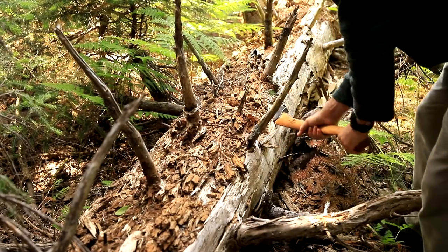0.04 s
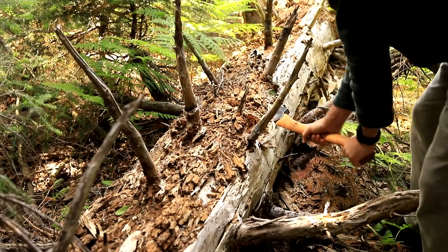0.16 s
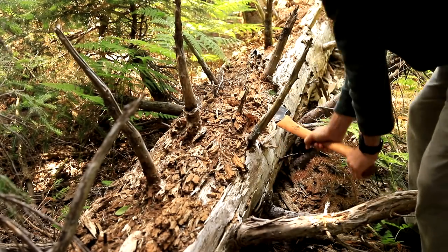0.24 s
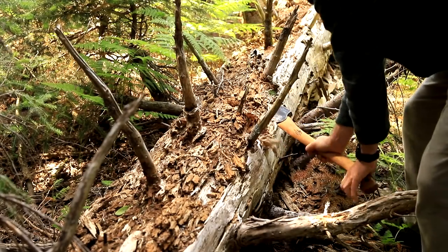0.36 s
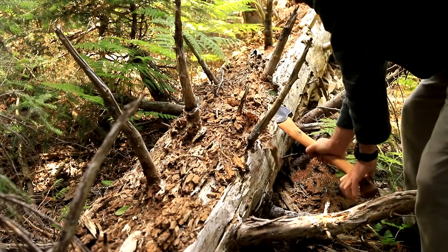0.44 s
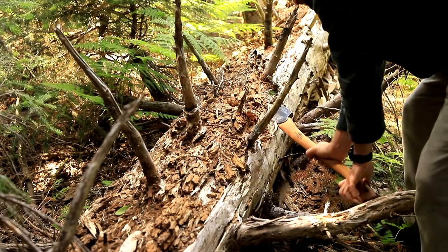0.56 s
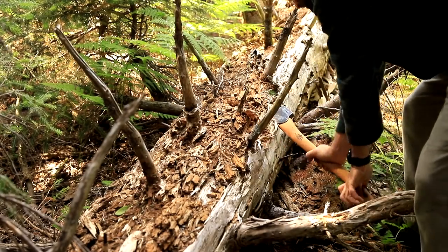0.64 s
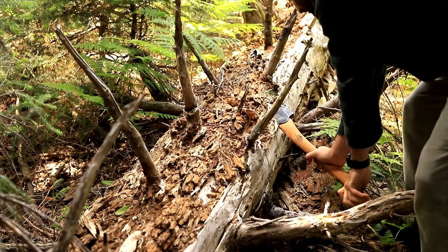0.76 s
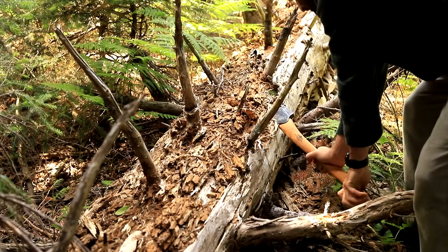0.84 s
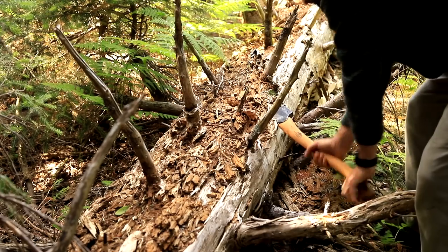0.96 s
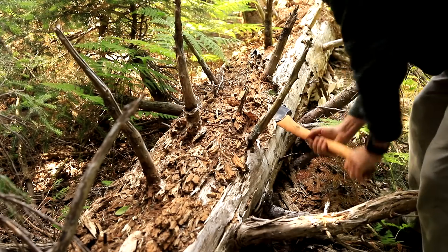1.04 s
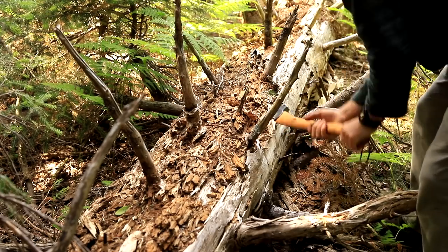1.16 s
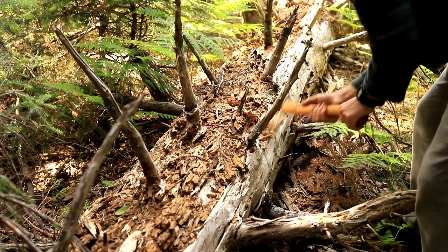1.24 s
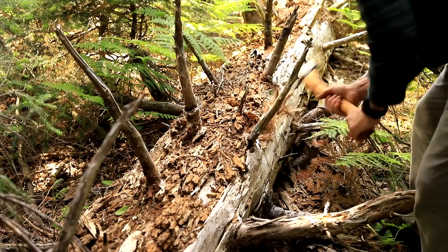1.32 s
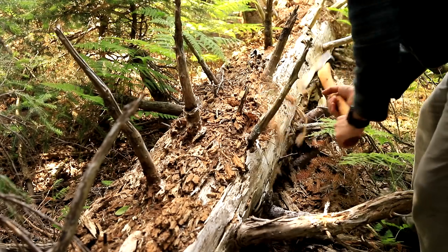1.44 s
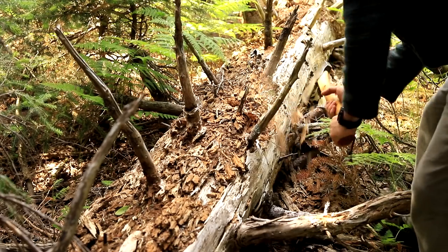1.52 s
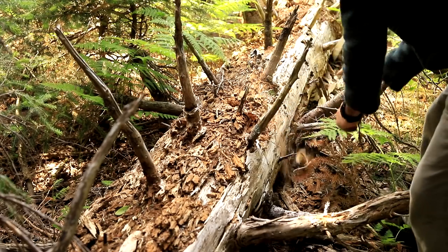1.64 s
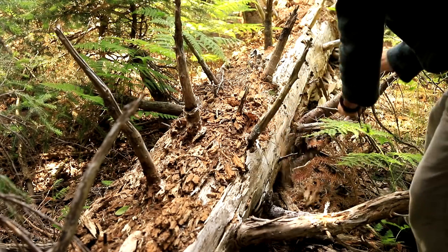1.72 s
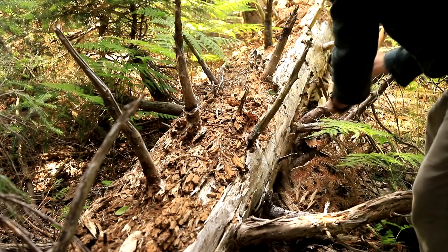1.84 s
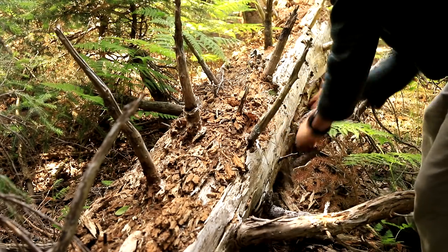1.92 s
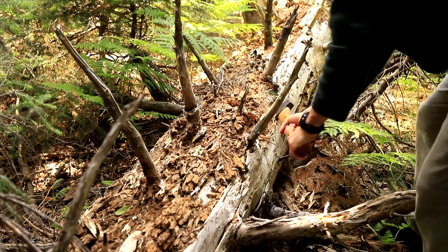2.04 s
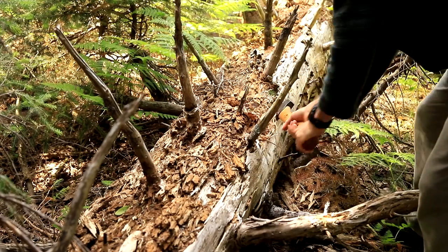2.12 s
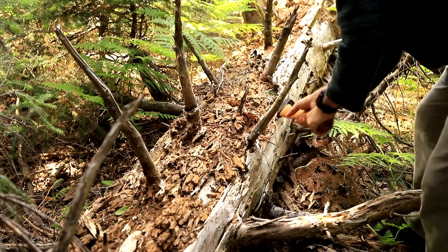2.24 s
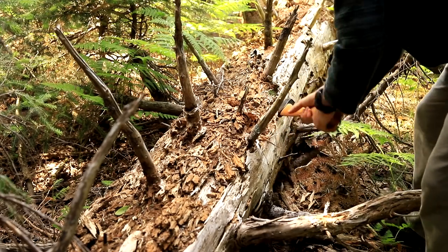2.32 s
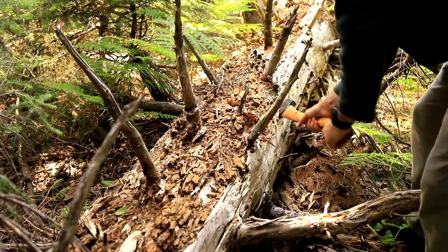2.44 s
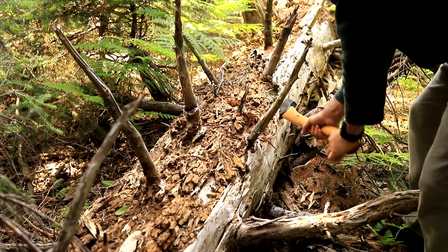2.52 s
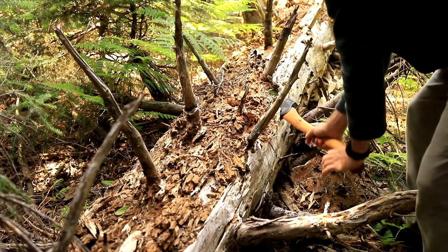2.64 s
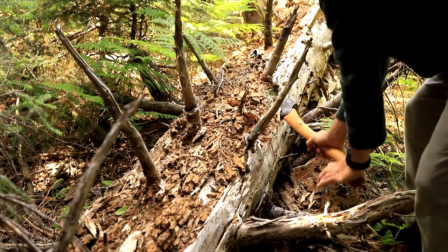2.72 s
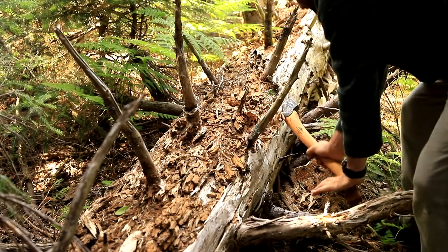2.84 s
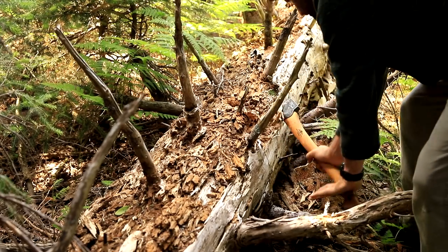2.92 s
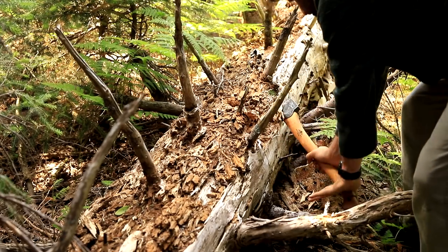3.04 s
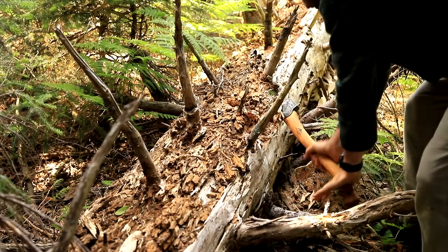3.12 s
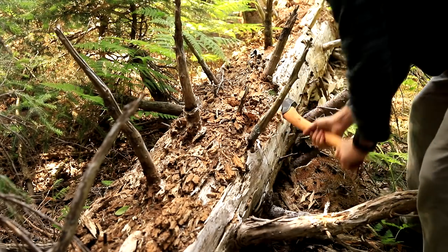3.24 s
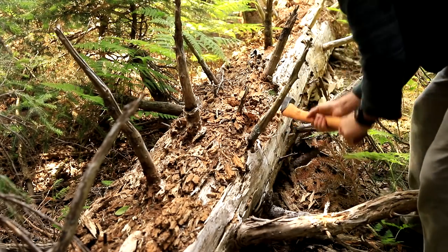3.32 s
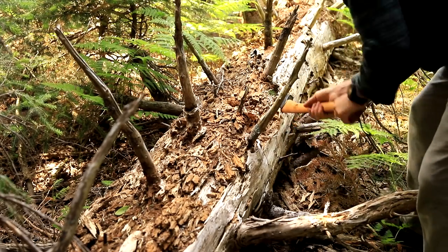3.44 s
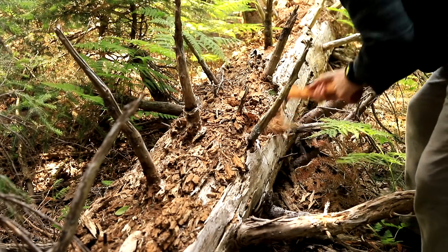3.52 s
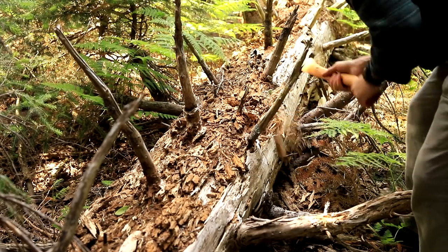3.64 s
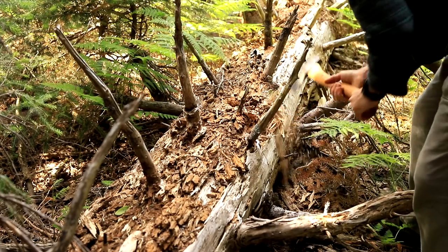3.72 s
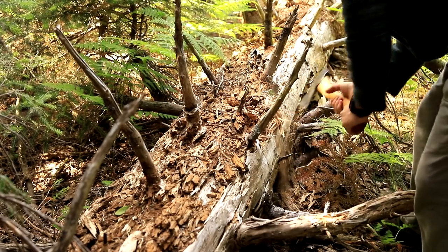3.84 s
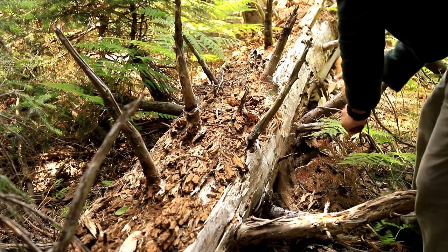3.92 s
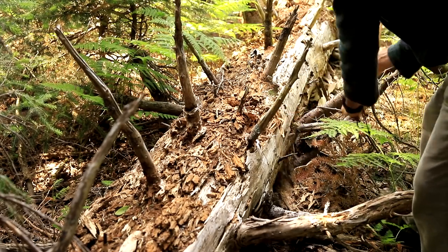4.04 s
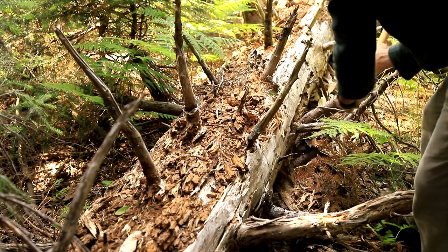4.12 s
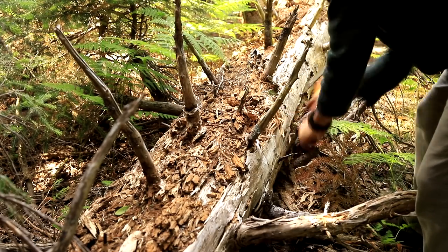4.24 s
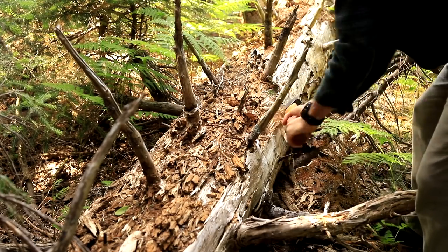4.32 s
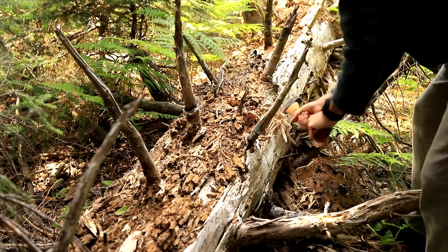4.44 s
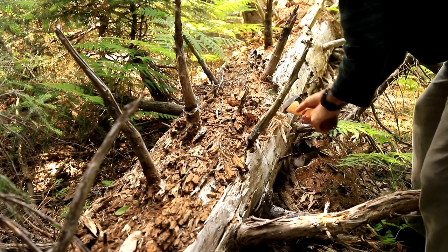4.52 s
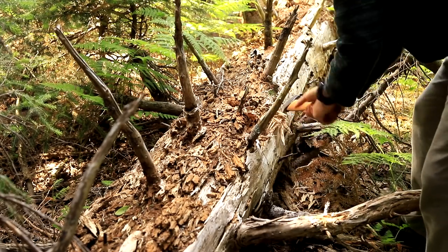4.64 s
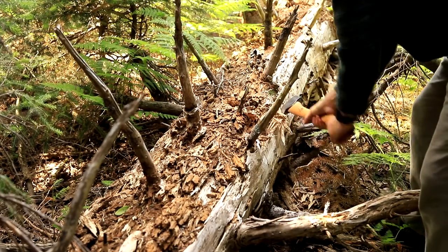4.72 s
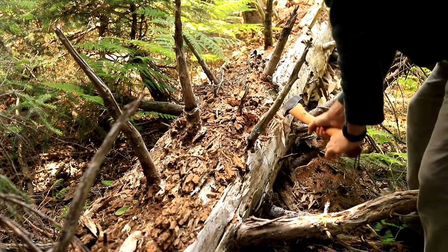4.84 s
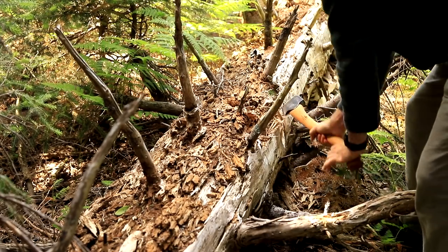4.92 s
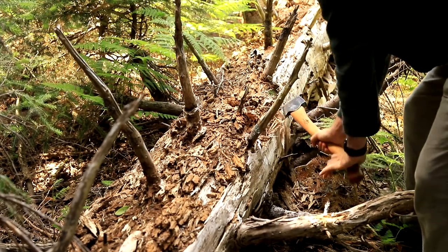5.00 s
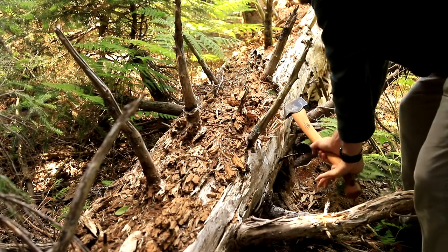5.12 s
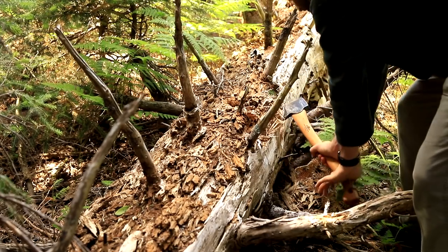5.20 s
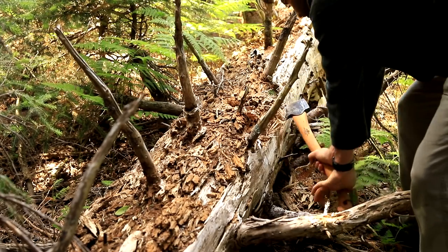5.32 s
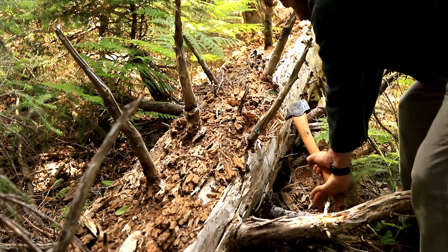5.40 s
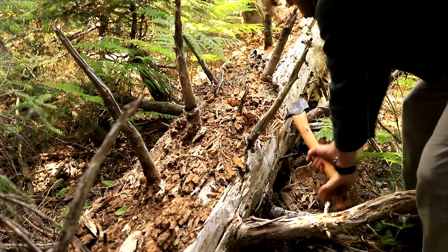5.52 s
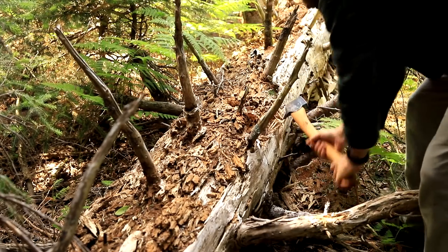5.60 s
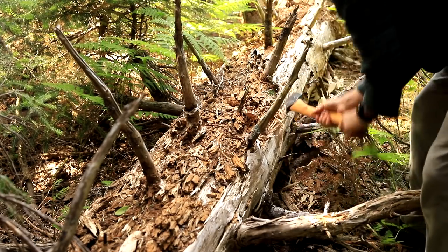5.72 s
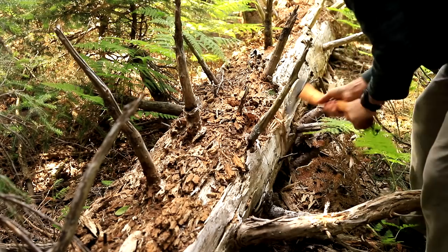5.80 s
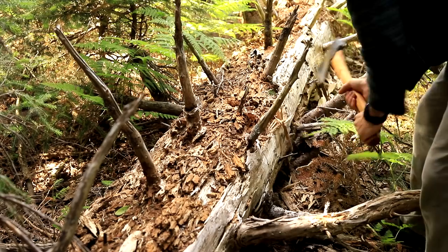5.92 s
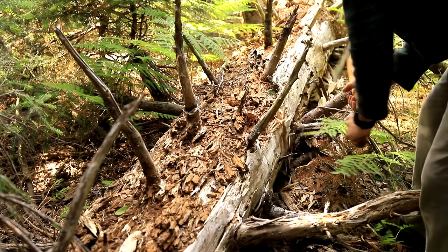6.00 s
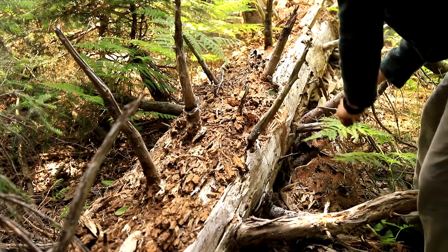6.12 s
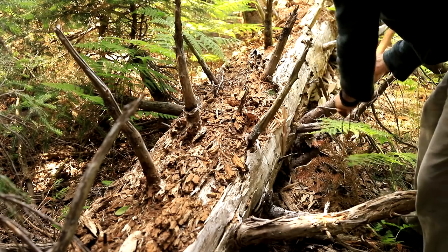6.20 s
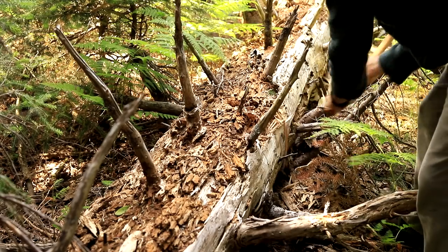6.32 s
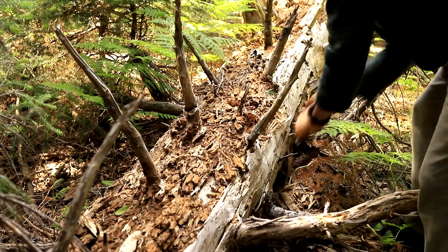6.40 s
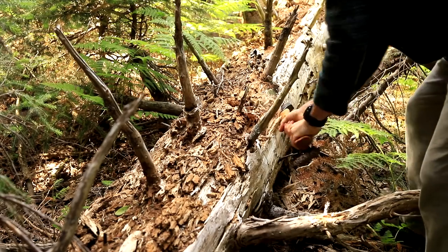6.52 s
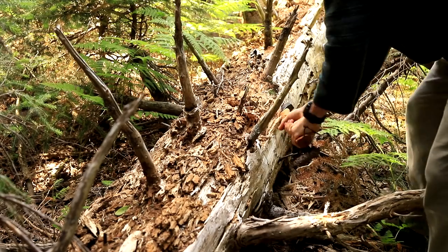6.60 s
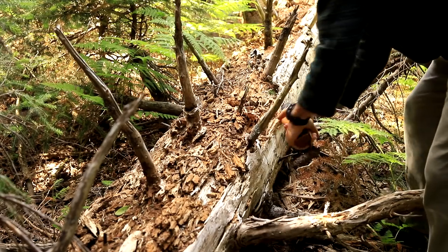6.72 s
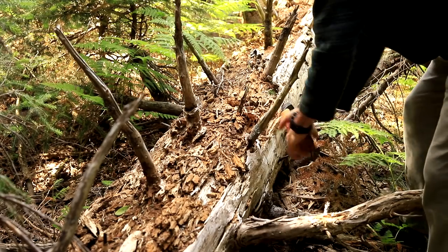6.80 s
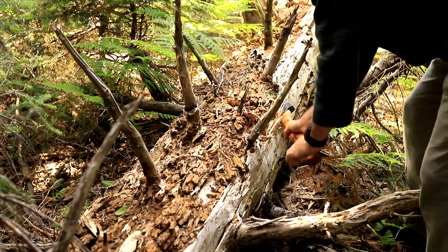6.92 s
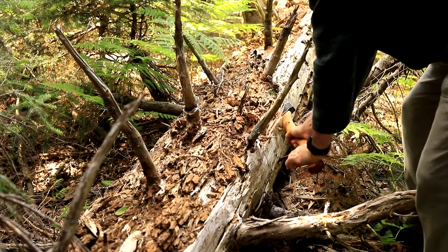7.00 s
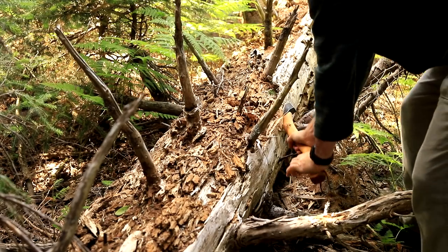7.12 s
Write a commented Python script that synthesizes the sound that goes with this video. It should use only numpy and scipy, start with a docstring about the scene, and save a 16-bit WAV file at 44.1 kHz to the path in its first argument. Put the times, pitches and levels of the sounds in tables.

```python
"""In a quiet forest a lever tears at a rotten log for a second; the hatchet's steel sings and far whistles pass.
A blow lands at 2.1 s and more slabs tear loose; one at 4.4 s leads into long tearing, one at 6.6 s into crumbs.
Noise bursts snap the fibres, damped log modes ring under each thud, and clumped grains of noise crumble.
Jolts send beating low tones through the ground into the microphone stand; trunks scatter the hits in still air."""
import sys
import numpy as np
from scipy import signal
from scipy.fft import rfft, irfft
from scipy.io import wavfile

SR = 44100
rng = np.random.default_rng(int(sys.argv[2]) if len(sys.argv) > 2 else 0)


def digitize_waveform(pressure):
    """Quantize a signal to 16-bit integers and store it at the path in sys.argv[1].

    Rows of a 2-D input are taken as channels; values are limited to [-1, 1].
    """
    field = np.atleast_2d(pressure).T
    bounded = np.clip(field, -1, 1)
    quanta = np.round(bounded * 32767).astype(np.int16)
    wavfile.write(sys.argv[1], SR, quanta)


N = 315756

# hatchet blows: (time [s], knock level [dB], centre of the knock [Hz], low shove level [dB])
BLOWS = [(2.091, 5, 915, -17), (4.403, 0.5, 1120, 1.5), (6.566, 4, 880, 0.5)]
# jolts that start the stand swinging: (time [s], sway level [dB], wobble level [dB], tremor level [dB])
JOLTS = [(-.06, -31.5, -44, -41), (0.402, -43, -39, -64), (0.839, -30, -53, -34),
         (1.378, -38.5, -42.5, -42.5), (2.093, -17, -22.5, -30), (3.093, -32, -40, -33.5),
         (3.6, -45, -43, -39), (4.415, -14.5, -23, -24), (5.902, -40.5, -46.5, -46.5),
         (6.596, -18, -17, -38)]


def from_db(db):
    """Decibels to gain."""
    return 10 ** (np.asarray(db) / 20)


def power_sum(levels_db):
    """Level of unrelated sounds heard together, each floored at -150 dB."""
    return 10 * np.log10(sum(from_db(2 * np.maximum(db, -150)) for db in levels_db))


def rms_one(x):
    """Scale to rms 1."""
    return x / np.sqrt(np.mean(x ** 2) + 1e-20)


def band(x, low_hz, high_hz):
    """Butterworth band-pass."""
    edges_hz = [low_hz, min(high_hz, .45 * SR)]
    return signal.sosfilt(signal.butter(2, edges_hz, "band", fs=SR, output="sos"), x + 1e-18)


def coloured(x, spectrum):
    """Noise shaped by a spectrum in dB; rms 1."""
    hz, db = np.transpose(spectrum)
    grid = np.maximum(np.arange(N // 2 + 1) * SR / N, 1)
    gain = from_db(np.interp(np.log(grid), np.log(hz), db))
    return rms_one(irfft(rfft(x) * gain, N))


def drift(pole_hz):
    """Random wander of rms 1: noise through two equal low-pass poles, drawn at every 40th sample."""
    r = np.exp(-80 * np.pi * pole_hz / SR)
    slow = signal.lfilter([1], [1, -2 * r, r * r], rng.standard_normal(N // 40 + 2002))
    slow = slow[2000:]   # skip the filter's start
    return np.interp(np.arange(N) / 40, np.arange(len(slow)), rms_one(slow))


def ring(x, hz, t60):
    """A damped mode: a unit click sets a sine ringing that falls 60 dB in t60 seconds."""
    r, w = from_db(-60 / (t60 * SR)), 2 * np.pi * hz / SR
    return signal.lfilter([0, np.sin(w)], [1, -2 * r * np.cos(w), r * r], x + 1e-18)


def add(out, s, piece, peak_db):
    """Lay a short sound at time s with a given peak."""
    at = round(s * SR)
    piece = piece[:N - at]
    out[at:at + len(piece)] += from_db(peak_db) * piece / np.abs(piece).max()


def ramp_db(s, rise, hold, loss_db_per_s, swing_db):
    """Level around a moment: climbs by swing_db over the rise, holds at 0 dB, then falls steadily."""
    t = np.arange(N) / SR - s
    climb = swing_db * np.minimum(t / rise, 0)
    fall = -loss_db_per_s * np.maximum(t - hold, 0)
    return np.minimum(climb, fall)


def knocks():
    """Chunks knock and fall; each blow knocks, shoves the log and rebounds twice, weaker and lower."""
    # knocking and falling chunks: (time [s], level [dB], centre of the knock [Hz])
    chunks = [(.141, -23.5, 454), (.177, -22.5, 500), (.215, -26.5, 506), (.385, -18, 500),
              (.437, -4.5, 258), (.525, -12, 345), (.717, -19, 453), (.849, -21, 154), (.917, -16.5, 430),
              (1.05, -28.5, 194), (1.347, -13, 382), (1.369, -14, 400), (1.734, -31, 700),
              (1.774, -24.5, 806), (2.908, -12.5, 595), (3.075, -4.5, 302), (3.161, -17.5, 343),
              (3.52, -20, 476.5), (3.622, -16, 440), (5.022, -9.5, 640), (5.422, -10.5, 590),
              (5.86, -23, 700), (6.548, -43, 400), (6.797, -26.5, 473), (7.045, -27.5, 430)]
    # rebounds: (delay after the blow [s], level relative to the blow [dB], share of its pitch [ratio])
    rebounds = [(.012, -5, 0.55), (0.023, -15, 0.15)]
    rows = list(chunks)
    for s, db, hz, shove_db in BLOWS:
        rows.append((s, db, hz))
        rows.append((s + 0.00102, shove_db, 227))   # low shove
        rows += [(s + lag, db + loss_db, hz * share) for lag, loss_db, share in rebounds]
    return rows


def thuds():
    """Soft wood crushes for some milliseconds and rings the log's damped modes near the pitch of the knock."""
    # modes of the log: (frequency [Hz], level [dB], decay by 60 dB [s])
    log_modes = [(157, -8, 0.17), (184, -12, 0.13), (271, -4.5, 0.054), (376, 0.5, 0.045), (447, -8, 0.09),
                 (495, 3, 0.033), (578, 15, 0.015), (770, -21, .02), (1024, 9, 0.012), (1210, 17.5, 0.0077),
                 (1870, -17, 0.0134)]
    crush_s, mode_spread_db = 0.0063, 2.9
    out, t = np.zeros(N), np.arange(5000) / SR
    rows = knocks()
    noise = rng.standard_normal((len(rows), 5000))
    spread = rng.normal(0, mode_spread_db, (len(rows), len(log_modes)))
    force = np.minimum(t / 0.00028, 1) * np.exp(-(t / crush_s) ** 2)
    for (s, level_db, centre_hz), grain, odd_db in zip(rows, noise, spread):
        push = (grain + 1.42 * np.exp(-t / 0.0004)) * force   # a firm first shove, then ragged crushing
        body = 0
        for (hz, db, t60), odd in zip(log_modes, odd_db):
            off_centre_db = -7.7 * np.log2(hz / centre_hz) ** 2
            body = body + from_db(db + odd + off_centre_db) * ring(push, hz, t60)
        body = rms_one(band(body, 173, 3400))
        crunch = signal.lfilter([1], [1, -.8], band(push, 600, 9000))   # the crushed fibres heard directly
        crunch_gain = from_db(-9.5) * centre_hz / 500   # brighter knocks crunch more
        add(out, s, body + crunch_gain * rms_one(crunch), level_db - 4.0)
    return out


def snaps():
    """A fibre breaks in a fraction of a millisecond; splinters trail for a few more."""
    # snapping fibres: (time [s], level [dB], centre [Hz], treble edge relative to the snap [dB])
    fibres = [(0.0404, -21, 5100, -33), (0.0648, -22, 2470, -29), (0.141, -20, 2670, -19),
              (0.178, -17, 2430, -27), (0.2152, -15.5, 2330, -11), (0.2682, -16.5, 2450, -13),
              (0.2992, -16, 2440, -22), (0.3447, -3.5, 3670, -17), (0.389, -14, 2520, -5),
              (0.4157, -17, 2710, -8), (0.4254, -16, 2670, 5), (0.4387, -3, 3650, -23),
              (0.495, -4, 3340, -9.5), (0.5395, -13, 2490, -7), (0.619, -14, 5200, -26),
              (0.6513, -12.5, 2860, -2.5), (0.666, -16, 3000, -24), (0.7203, -20, 3060, -17),
              (0.7293, -16, 3750, -6), (0.7494, -13.5, 3920, -11), (0.7654, -8, 2490, -12),
              (0.791, -7.5, 4630, -24), (0.8155, -11.5, 2380, -11), (0.8746, -21, 4530, -19),
              (0.9172, -21.5, 3800, -8), (1.022, -31, 2450, -14), (1.0415, -24, 3530, -21),
              (1.083, -28, 3950, -28), (1.1283, -29, 3690, -21), (1.3204, -13.5, 2740, -30),
              (1.3334, -19, 2240, -25), (1.366, -11.5, 3930, -26), (1.4094, -29, 2360, -4),
              (1.551, -35, 2240, -19), (1.719, -32.5, 2710, -16), (1.7739, -40, 2530, 2),
              (1.8038, -32.5, 5140, 1.5), (1.8625, -34, 3220, 6), (2.0916, -2, 2830, -13),
              (2.1044, -9, 2460, -25), (2.4327, -21, 4100, -15), (2.5343, -28, 2220, -22),
              (2.5588, -22.5, 4130, -25), (2.7324, -17.5, 3640, -25), (2.794, -13.5, 2880, -19),
              (2.811, -10, 2300, -4.5), (2.8352, -9, 3000, -8), (2.8772, -6, 3900, -8),
              (2.9096, -3, 2360, -6.5), (2.9357, -6, 4500, -23), (3.0028, -8.5, 2780, -13),
              (3.0463, -6.5, 4400, -9), (3.0793, -6, 4170, -11), (3.1318, -21.5, 4140, -17),
              (3.1594, -26, 2940, -9), (3.194, -25, 2520, -3), (3.259, -24, 3680, -10),
              (3.4934, -25, 2970, -14), (3.5044, -2, 3800, -18), (3.5213, 4, 3700, -27),
              (3.541, -7, 5130, -24), (3.5498, -4, 2940, -19), (3.5826, -13, 4060, -15),
              (3.5952, 4, 3100, -13), (3.6231, -3.5, 4150, -12), (3.7555, -30.5, 2430, 2.5),
              (4.2655, -25.5, 2510, -7), (4.4033, 15, 4330, -13.5), (4.4139, -6.5, 2230, -22),
              (4.6423, -12.5, 4800, -31), (4.6691, -36, 3640, -17), (4.6886, -14.5, 5200, -21),
              (4.721, -26, 4700, -21), (4.7411, -31, 3630, -16), (4.8867, -20.5, 3750, 2),
              (4.9307, -13.5, 3100, -10), (4.945, -20, 2280, -15), (4.9868, -17.5, 3020, -5),
              (5.0097, -13, 3210, -11), (5.0254, -5.5, 3430, -16), (5.0555, -21, 5010, -18),
              (5.0776, -6.5, 3150, -20), (5.1023, -5.5, 3200, -26), (5.1076, -2.5, 2840, -13),
              (5.1695, -8, 2850, -5), (5.1839, -8, 4800, -6), (5.2061, -2.5, 4000, -20),
              (5.2216, -8, 3520, -26), (5.2696, 0, 4300, -20), (5.2937, -15, 3920, -19),
              (5.3201, -3.5, 3300, -42), (5.346, -7, 3900, -28), (5.3869, 2, 3700, -24),
              (5.4195, -14, 3560, -18), (5.4313, 4, 5100, -27), (5.468, -18.5, 3300, 0.5),
              (5.5041, -10, 4590, -8), (5.5743, -37, 4570, -12), (5.614, -20.5, 3470, -23),
              (5.6466, -17, 3560, -16), (5.6716, -26, 5500, -11.5), (5.7109, -8.5, 5240, -17),
              (5.73, -20, 2520, -26), (5.7788, -21, 3560, -15), (5.8025, -15, 2830, -27),
              (5.8153, -29, 3400, -13), (5.8492, -15, 4050, -18), (5.8544, -24, 2920, -22),
              (5.8684, -6, 5450, -20), (5.8755, 0, 3460, -10), (5.8881, -7, 3130, -29),
              (5.8952, -3.5, 3140, -28), (5.9097, -15, 3470, -21), (6.19, -43, 4510, -16),
              (6.2174, -30, 3140, -12), (6.567, 1, 2430, -6), (6.5794, -23, 2440, -21),
              (6.8638, -33, 2620, -23), (6.9822, -32.5, 2620, -3), (7.017, -17.5, 2740, -5),
              (7.0538, -25.5, 2600, -9), (7.0872, -25, 3900, -20), (7.1247, -14.5, 4770, -17)]
    out, t = np.zeros(N), np.arange(1000) / SR
    noise = rng.standard_normal((len(fibres), 3, 1000))
    splinters = 0.11 * np.exp(-t / 0.0027)
    burst = np.minimum(t / 0.000039, 1) * (np.exp(-t / 0.00019) + splinters)
    for (s, level_db, hz, edge_db), (mid, low, high) in zip(fibres, noise):
        add(out, s, band(mid * burst, hz / 1.655, hz * 1.414), level_db + 0.077)
        add(out, s, band(low * burst, 510, 1880), level_db - 15.5)
        add(out, s, band(high * burst, 8300, 12400), level_db + edge_db + 0.66)
    return out


def crumble_levels():
    """Grit and crumbs follow the tears and the debris of blows; dust follows the grit."""
    # pulls on the lever that tear the wood: (time of full strength [s], build-up [s], hold [s],
    # dying [s], grit level [dB], coarse crumbs relative to grit [dB])
    tears = [(0.215, 0.1, 0.093, 0.12, -42.5, 4), (0.367, 0.26, 0.032, .05, -33, -8),
             (0.433, 0.11, 0.0046, 0.066, -19, -8), (0.536, .1, 0.0079, 0.059, -36.5, -12),
             (0.743, 0.8, 0.037, 0.31, -34.5, -4.5), (1.02, 0.035, 0.012, 0.42, -44, -2),
             (1.334, 0.067, 0.036, .07, -28.5, -4.5), (1.782, 0.076, 0.13, 0.36, -54, -7),
             (2.424, 0.25, 0.012, 0.093, -45, 1), (2.635, 0.21, 0.12, 0.075, -33.5, -4.5),
             (2.874, 0.42, 0.059, 0.21, -29.5, -9.5), (3.06, 0.17, 0.031, 0.055, -37, -8.5),
             (3.396, 0.6, .02, 0.22, -45, -3.5), (3.512, 0.14, 0.11, 0.11, -25.5, -8.5),
             (4.68, 0.14, 0.067, 0.034, -39, -11), (5.048, 0.32, 0.18, 0.07, -30, -7),
             (5.312, 0.09, 0.021, 0.25, -30, -11.5), (5.423, .15, 0.01, 0.27, -27, -8.5),
             (5.706, 0.084, 0.012, 0.38, -44, -5.5), (5.87, 0.11, 0.025, 0.065, -24, -15.5),
             (7.09, 0.33, 0.04, 0.11, -44, -3.5)]
    # debris after every blow, a burst and a settling: (grit level [dB], crumb level [dB], loss [dB/s])
    debris = [(-28, -20, 550), (-41, -42, 70)]
    # what keeps falling: (grit level [dB], crumb level [dB], dust level [dB])
    trickle_db = (-57.5, -56, -65)
    swing_db = 31   # level crossed in a tear's build-up and dying
    grit_parts, crumb_parts = [trickle_db[0]], [trickle_db[1]]
    for s, rise, hold, dying, db, coarse_db in tears:
        ramp = ramp_db(s, rise, hold, swing_db / dying, swing_db)
        grit_parts.append(ramp + db)
        crumb_parts.append(ramp + db + coarse_db)
    for s, *_ in BLOWS:
        for db, crumb_db, loss in debris:
            ramp = ramp_db(s + 0.0025, 0.0047, 0, loss, 40)
            grit_parts.append(ramp + db)
            crumb_parts.append(ramp + crumb_db)
    grit_db = power_sum(grit_parts)
    raised_dust_db = -44.5 + 0.97 * (grit_db + 34)   # dust takes nearly all of the grit's swing
    return grit_db, power_sum(crumb_parts), power_sum([trickle_db[2], raised_dust_db])


def grains(per_s, spread_db, length, clumps):
    """Envelope of tiny random bursts of very uneven size, denser inside the clumps; rms 1."""
    born = rng.random(N) < per_s * clumps / SR
    sizes = born * from_db(spread_db * np.minimum(rng.exponential(1, N), 3.5))
    return rms_one(signal.lfilter([1], [1, -np.exp(-1 / (length * SR))], sizes))


def crumble():
    """Grains of many sizes come in shared clumps, each pitch with its own grains, over a fine hiss."""
    # pitches of the grit: (frequency [Hz], level [dB])
    grit_pitches = [(1300, -10), (2000, -6), (3000, -5.5), (4300, -4.5), (6000, -3.5)]
    grit_db, crumb_db, dust_db = crumble_levels()
    clumps = from_db(3 * drift(40))
    broad = grains(250, spread_db=3.0, length=0.0018, clumps=clumps)   # breaks that sound at every pitch
    grit = 0
    for hz, db in grit_pitches:
        own = grains(260, spread_db=6, length=.0005, clumps=clumps)
        shower = broad + .7 * own + .3 * clumps
        grit = grit + from_db(db) * rms_one(band(rng.standard_normal(N) * shower, hz / 1.31, hz * 1.103))
    calm = np.clip((-44 - grit_db) / 8, 0, 1)   # a faint trickle is smoother, with weaker large pieces
    slow_breaks = signal.lfilter([.01], [1, -.99], broad)   # larger pieces part more slowly
    lumps = (1 - 0.31 * calm) * slow_breaks + .5 * clumps ** (1 - calm)
    crumbs = band(rng.standard_normal(N) * lumps, 267, 1060)
    dust = band(rng.standard_normal(N) * (broad + 0.65 * clumps), 7300, 12500)
    layers = ((grit_db, grit), (crumb_db, crumbs), (dust_db, dust))
    return sum(from_db(db) * rms_one(layer) for db, layer in layers)


def shudder_levels():
    """After a jolt each motion swells, drops quickly and lingers faintly."""
    # sway, wobble and tremor in turn: (swell [s], loss [dB/s], lingering part relative to the jolt [dB],
    # its loss [dB/s], rest level [dB])
    motions = [(0.055, 97, -8.5, 34, -68), (0.06, 111, -19.5, 35, -72), (0.0075, 183, -25.5, 17, -69)]
    levels = []
    for k, (swell, loss, linger_db, slow_loss, rest_db) in enumerate(motions):
        parts = [rest_db]
        for jolt in JOLTS:
            for db, rate in ((0, loss), (linger_db, slow_loss)):
                parts.append(jolt[k + 1] + db + ramp_db(jolt[0] + swell, swell + 0.0081, 0, rate, 33))
        levels.append(power_sum(parts))
    return levels


def stand():
    """Close pairs of low modes beat after every jolt; through the ground the higher pitches arrive first."""
    # pairs of modes of the stand: (frequency [Hz], level [dB])
    sway, wobble, tremor = [(30, -0.61), (42.5, -0.36)], [(84, -7), (97, -24.5)], [(112, 0.46), (138, 1.9)]
    t = np.arange(N) / SR
    starts = np.array(JOLTS)[:, 0]
    latest = np.maximum(np.searchsorted(starts, t, side="right") - 1, 0)
    since = t - starts[latest]
    out = 0
    for modes, level_db, glide in zip((sway, wobble, tremor), shudder_levels(), (.05, .35, .6)):
        warped = since + glide * 0.0611 * (1 - np.exp(-since / 0.054))   # pitch starts high and settles
        lower, upper = (from_db(db) * np.sin(2 * np.pi * hz * warped) for hz, db in modes)
        swing = lower - upper   # opposed at first, so the swing swells out of rest
        unrest = rms_one(band(rng.standard_normal(N), modes[0][0] * 0.61, modes[0][0] * 1.27))
        out = out + from_db(level_db) * rms_one(rms_one(swing) + .5 * unrest)
    return band(out, 22.3, 188)


def steel():
    """The hatchet head sings on one mode of steady pitch and gently wavering level."""
    # singing moments: (time of full strength [s], level [dB], swell [s], hold [s])
    songs = [(.83, -54, .03, .14), (2.19, -58, .1, .1), (6.05, -58, .1, .15)]
    steel_hz, loss_db_per_s = 4590, 150
    level_db = power_sum([db + ramp_db(s, swell, hold, loss_db_per_s, 35) for s, db, swell, hold in songs])
    tone = np.sin(2 * np.pi * steel_hz * np.arange(N) / SR)
    return from_db(level_db + 3.2 * drift(6.9)) * tone


def whistles():
    """Far whistles: thin sagging tones, breathy because chance moves their pitch and strength."""
    # far whistles: (centre of the swell [s], pitch [Hz], level [dB], sag [Hz/s])
    calls = [(1.17, 7980, -58, 2500), (1.56, 7330, -64, 200)]
    t, out = np.arange(N) / SR, np.zeros(N)
    for s, hz, db, sag in calls:
        pitch = hz - sag * np.clip(t - s, -.2, .2) + 60 * drift(36)
        breath = np.exp(-((t - s) / .09) ** 2) * drift(250)
        out += from_db(db) * breath * np.sin(2 * np.pi * np.cumsum(pitch) / SR)
    return out


def trunks(x):
    """Scatter from trunks and ground: a dull dying wash that builds after the direct sound."""
    t60_s, level_db, cut_hz = .4, -28, 11000
    t = np.arange(SR // 2) / SR
    wash = rng.standard_normal(len(t)) * from_db(-60 * t / t60_s) * np.minimum(t / 0.0078, 1)
    wash = band(wash, 150, cut_hz)
    wash = wash / np.sqrt(np.sum(wash ** 2))
    return from_db(level_db) * signal.fftconvolve(x, wash)[:N]


def still_air():
    """The quiet forest: steady coloured noise whose level drifts by about a decibel."""
    # colour of the still air: (frequency [Hz], relative level [dB])
    air_colour = [(35, -29), (60, 14), (262, 2.5), (315, 5), (593, -7), (2090, -14.5), (5860, -12),
                  (8320, -19), (12700, -19), (16000, -19.5)]
    return from_db(-51 + 1.0 * drift(0.37)) * coloured(rng.standard_normal(N), air_colour)


def scene():
    """Work at the log, its scatter, the stand, thin tones and the still air."""
    hits = thuds() + snaps()
    work = hits + crumble() + stand() + steel()
    return (work + trunks(hits) + whistles() + still_air())[None]


def record(dry):
    """The loudest peaks overload softly below full scale, then the top is cut."""
    cutoff_hz = 16500
    clipped = dry / (1 + np.abs(dry) ** 6) ** (1 / 6)
    return signal.sosfilt(signal.cheby2(16, 85, cutoff_hz, fs=SR, output="sos"), clipped)


dry = scene()
out = record(dry)
digitize_waveform(out)
```